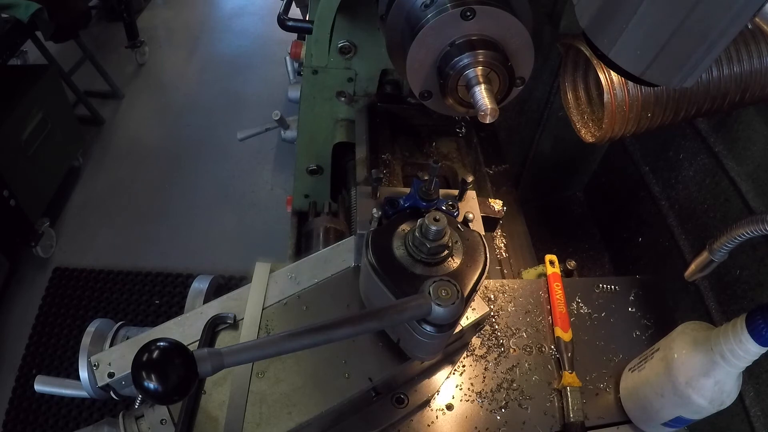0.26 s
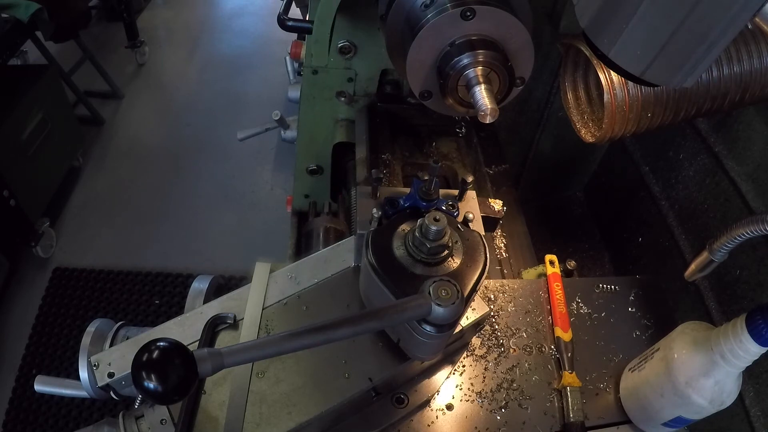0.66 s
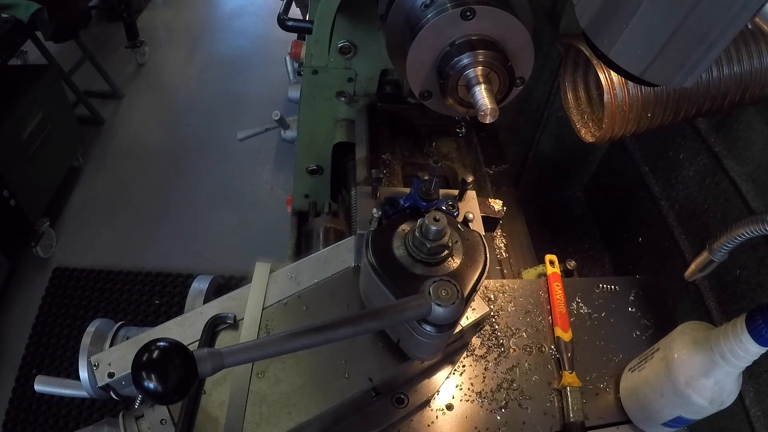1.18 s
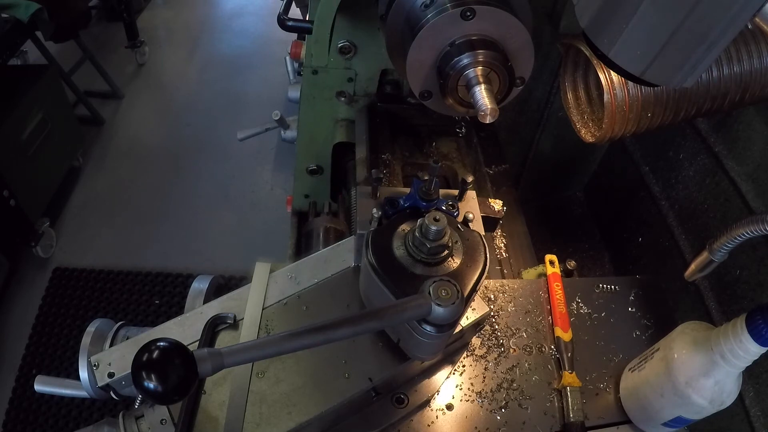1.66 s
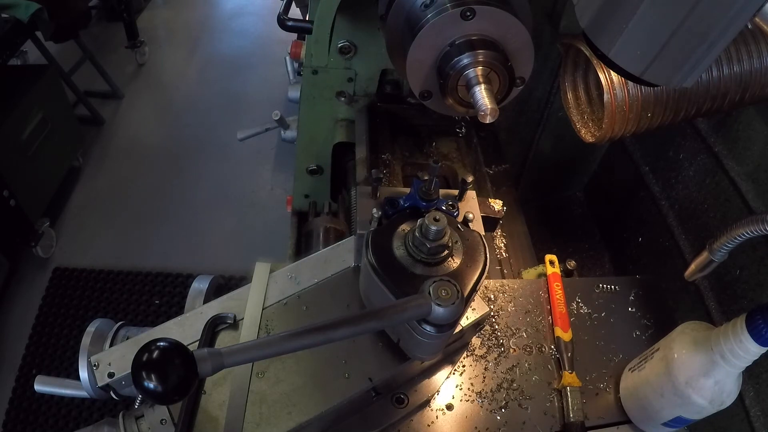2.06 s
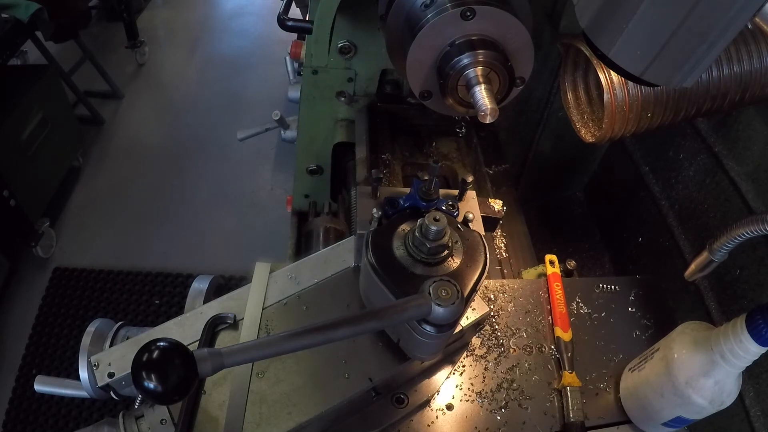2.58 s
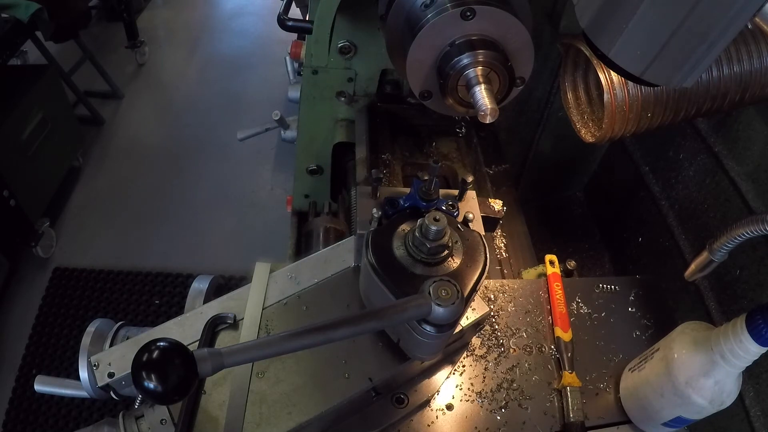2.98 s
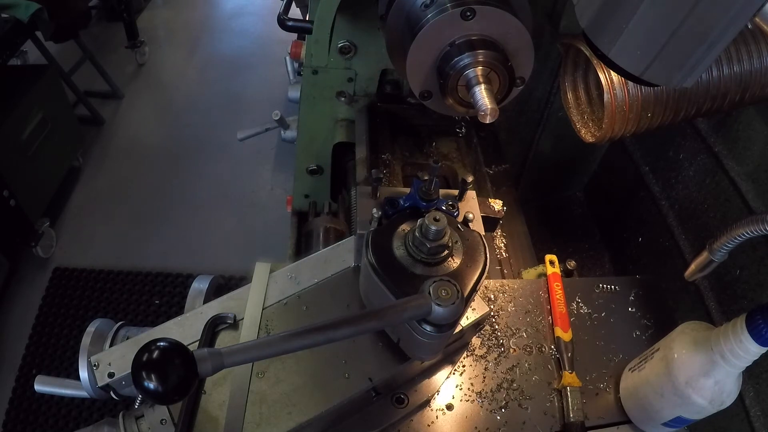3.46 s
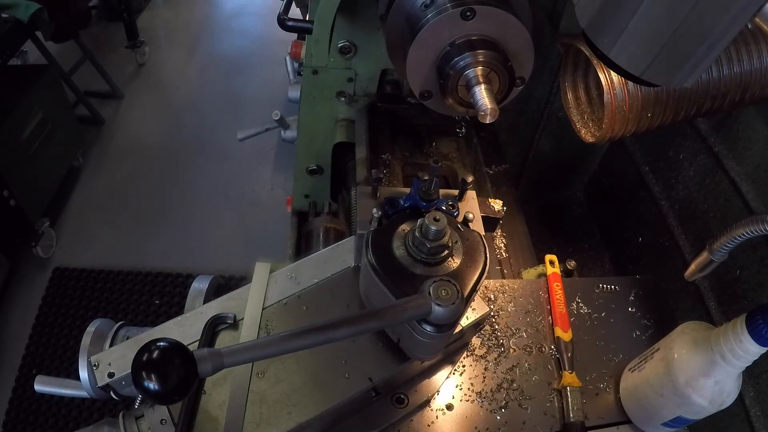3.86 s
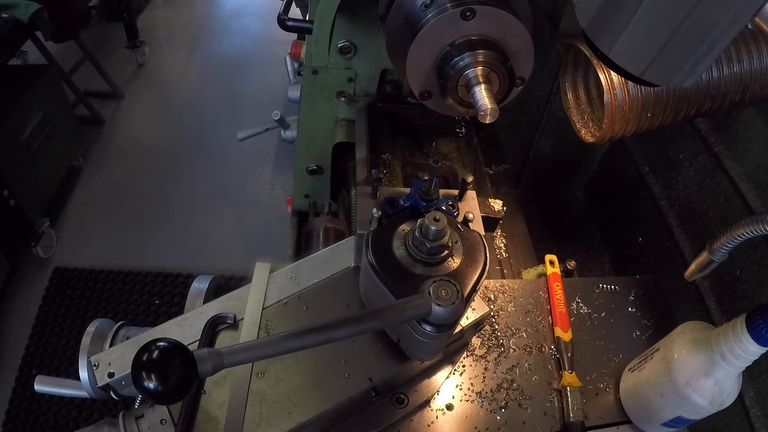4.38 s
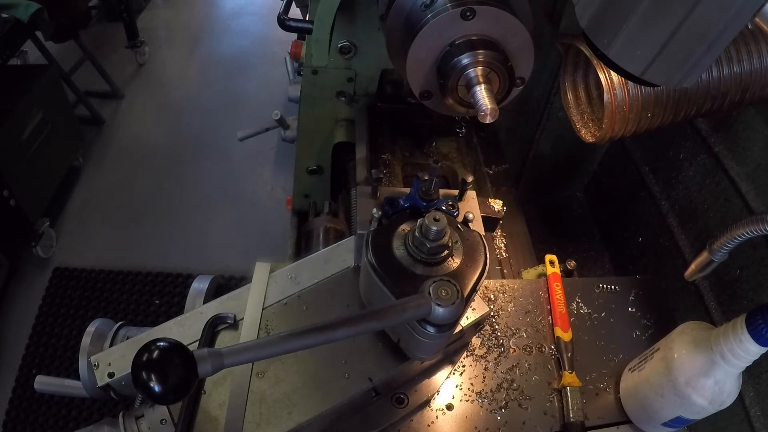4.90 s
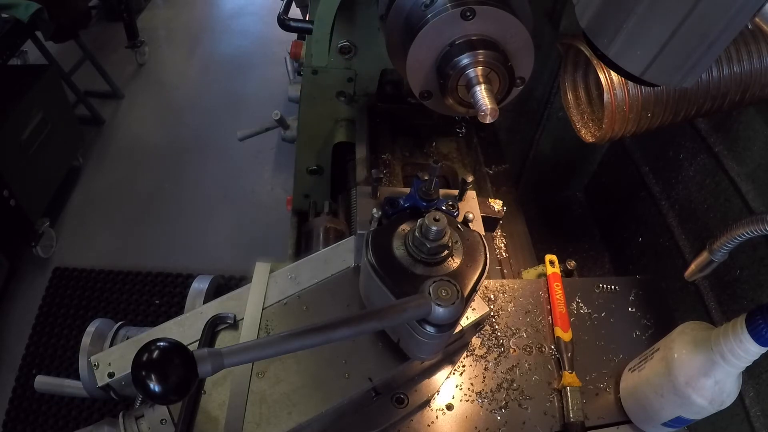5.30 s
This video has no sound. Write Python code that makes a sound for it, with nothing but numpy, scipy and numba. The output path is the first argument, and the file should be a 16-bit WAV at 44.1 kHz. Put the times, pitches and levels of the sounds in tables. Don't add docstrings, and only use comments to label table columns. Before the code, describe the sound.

Bright, fluttering air blast with breathy whistles cuts out suddenly in a workshop; a small click follows, then a hard metallic drop and ringing rattle.

```python
import sys
import numpy as np
from scipy import signal
from scipy.fft import rfft, irfft
from scipy.io import wavfile
from scipy.ndimage import uniform_filter1d
from numba import njit

SR = 44100
rng = np.random.default_rng(int(sys.argv[2]) if len(sys.argv) > 2 else 0)


def volts(x):
    e = np.asarray(x, float) / 20
    return 10 ** e


def master(y):
    cut = np.clip(np.atleast_2d(y).T, -1, 1)
    pcm = np.round(cut * 32767)
    wavfile.write(sys.argv[1], SR, pcm.astype(np.int16))


N = 243917


def rms_one(x):
    return x / np.sqrt(np.mean(x ** 2) + 1e-20)


def in_time(rows):
    s, *columns = np.transpose(rows)
    t = np.arange(N) / SR
    return [np.interp(t, s, column) for column in columns]


def at_hz(points, hz):
    points_hz, values = np.transpose(points)
    return np.interp(np.log(hz), np.log(points_hz), values)


def plateau(start, length, edge_s):
    t = np.arange(N) / SR - start
    return np.sin(np.pi / 2 * np.clip(np.minimum(t, length - t) / edge_s + .5, 0, 1)) ** 2


def burst(start, hold, level_db, attack_s, fade_db_per_s):
    t = np.arange(N) / SR - start
    return np.clip(t / attack_s, 0, 1) * volts(level_db - fade_db_per_s * np.maximum(t - hold, 0))


def coloured(spectrum):
    hz = np.maximum(np.arange(N // 2 + 1) * SR / N, 1)
    return rms_one(irfft(rfft(rng.standard_normal(N)) * volts(at_hz(spectrum, hz)), N))


def drift(rate):
    r = np.exp(-80 * np.pi * rate / SR)
    slow = signal.lfilter([1], [1, -2 * r, r * r], rng.standard_normal(N // 40 + 2002))[2000:]
    return np.interp(np.arange(N) / 40, np.arange(len(slow)), rms_one(slow))


def band_pass(x, low_hz, high_hz):
    return signal.sosfilt(signal.butter(2, [low_hz, high_hz], "band", fs=SR, output="sos"), x)


@njit
def resonate(x, angle, r):
    y = np.zeros(len(x))
    for i in range(2, len(x)):
        y[i] = x[i] - x[i - 2] + 2 * r * np.cos(angle[i]) * y[i - 1] - r * r * y[i - 2]
    return y


def blown(hz, width_hz, order=1):
    angle = 2 * np.pi * hz / SR * np.ones(N)
    air = rng.standard_normal(N)
    for _ in range(order):
        air = rms_one(resonate(air, angle, np.exp(-np.pi * width_hz / SR)))
    return air


def struck(modes, blows, spread_s):
    out = np.zeros(N)
    for hz, *levels_db, t60 in modes:
        push = np.full(N, 1e-18)
        for blow, level_db in zip(blows, levels_db):
            push[round((blow[0] + spread_s * rng.random()) * SR)] = volts(level_db)
        r = volts(-60 / (t60 * SR))
        w = 2 * np.pi * hz / SR
        ring = signal.lfilter([0, np.sin(w)], [1, -2 * r * np.cos(w), r * r], push)
        out += volts(2.5 * drift(18.7)) * ring
    return out


# f/Hz, T60/s
SHOP_T60 = [(100, 0.25), (700, 0.35), (2000, 0.39), (5000, 0.37), (13000, .3)]


def echoes():
    t = np.arange(round(.6 * SR)) / SR
    tail = np.zeros(len(t))
    for low in 60 * 2. ** np.arange(0, 8, .5):
        band = band_pass(rng.standard_normal(len(t)), low, low * 2 ** .5)
        tail += band * volts(-60 * t / at_hz(SHOP_T60, low)) * (t > .003)
    return tail / np.linalg.norm(tail)


def shop(x, wet_db):
    turn = 1.5 * drift(0.83)
    wet = signal.fftconvolve(x * np.cos(turn), echoes())
    wet += signal.fftconvolve(x * np.sin(turn), echoes())
    return x + volts(wet_db) * wet[:N]


# f/Hz, level/dB per Hz
FLOOR_NOISE = [(20, -4), (40, -2.5), (80, -13.5), (150, -10.5), (250, -17), (649, -20), (7440, -29),
               (15300, -33.5)]


def shop_floor():
    return volts(-65) * coloured(FLOOR_NOISE)


# f/Hz, level/dB per Hz
CLOTH = [(88, -31), (200, -5), (350, -2.5), (600, -3), (1310, -2.5), (2530, -10.5), (8080, -10.5),
         (15300, -26)]
# start t/s, hold t/s, level/dB, attack t/s
RUBS = [
    (3.788, 0.032, -57, .015),
    (3.848, 0.092, -72, .03),
    (4.68, .05, -65, .03),
    (4.776, .08, -61, .05),
    (4.9, .13, -67, .04),
    (5.12, .07, -64, .04),
    (5.192, 0.074, -51.5, .005),
    (5.29, 0.086, -65.5, .01),
    (5.44, .06, -63.5, .03),
]


def rustle():
    grain = volts(-1.0 + 1.6 * drift(60.)) * coloured(CLOTH)
    power = sum(burst(*rub, fade_db_per_s=300.) ** 2 for rub in RUBS)
    return grain * np.sqrt(power)


# f/Hz, level/dB, T60/s
STAND = [(20.9, -3.0, 3.8), (27.1, 1.5, 4.0)]
# t/s, signed height of the swing
SHOVES = [
    (3.847, -.0004),
    (3.889, -.0014),
    (3.931, -.002),
    (3.973, -.003),
    (4.02, -.0076),
    (4.057, -.0058),
    (4.193, .0061),
    (4.353, .0041),
    (4.53, -.0046),
]


def rocking():
    out = np.zeros(N)
    t = np.arange(N) / SR
    swing = sum(volts(db - 60 * t / t60) * np.sin(2 * np.pi * hz * t) for hz, db, t60 in STAND)
    for s, height in SHOVES:
        start = round(s * SR)
        out[start:] += height * swing[:N - start]
    return uniform_filter1d(out, size=400)


# t/s, boom level/dB, clank level/dB, crack level/dB, rattle T60/s
BLOWS = [
    (3.990, -27, -22, -31.5, 0.033),
    (4.006, -37, -28.5, -50.5, .04),
    (4.051, -24, -22, -24.5, 0.022),
    (4.144, -14.5, -18.5, -13, 0.036),
]
# f/Hz, level/dB
BLOW_SHAPE = [(70, -31), (200, -21), (600, -2.5), (1300, 0), (3900, -4), (6000, -1), (9000, -6),
              (15000, -13)]
# f/Hz, T60/s
TAIL = [(100, 1.4), (260, 1.24), (700, 0.78), (1300, 0.55), (1700, 0.41), (4850, 0.3), (12800, 0.17)]


def crash(room_db):
    out = np.zeros(N)
    t = np.arange(N) / SR
    edges = 70 * 2 ** np.arange(0, 7.9, 1 / 3)
    white = rng.standard_normal((2, N))
    for k, (low, high) in enumerate(zip(edges, edges[1:])):
        hz = np.sqrt(low * high)
        power = np.zeros(N)
        for s, boom_db, clank_db, crack_db, rattle_t60 in BLOWS:
            age = t[:N - round(s * SR)]
            level_db = at_hz([(700, boom_db), (2500, clank_db), (6000, crack_db)], hz)
            level_db += at_hz(BLOW_SHAPE, hz)
            swell = 1 - np.exp(-age / (0.00073 + 5.6 / hz))
            rattle = volts(-60 * age / rattle_t60)
            tail = volts(room_db - 60 * age / at_hz(TAIL, hz))
            power[-len(age):] += (volts(level_db) * swell) ** 2 * (rattle ** 2 + tail ** 2)
        out += np.sqrt(power) * rms_one(band_pass(white[k % 2], low, high))
    return out


# f/Hz, first-blow level/dB, last-blow level/dB, T60/s
TRAY = [(108, -40, -44.5, 0.53), (140.5, -44, -45, 0.42), (187.5, -44, -53, 1.5), (214.4, -44, -47, 1.6),
        (264, -43, -41, 1.45), (301.3, -34, -43, 0.68), (323, -39, -36, 1.91), (373, -46.5, -42.5, 1.77),
        (383, -56, -36, 1.1), (446, -58.5, -35.5, 1.15), (485.4, -38, -24, 0.57), (608, -37, -37, 1.3),
        (640, -43, -22.5, 0.41), (662, -53, -44.5, 1.29),
        (722, -28, -25, 0.47), (762, -38, -24.5, 0.3), (805, -17.5, -25, 0.06), (842, -38, -21.5, 0.23),
       (886, -38, -29, 0.71), (951, -45.5, -27.5, 0.7), (1047, -33, -26, 0.23), (1160, -37, -31, 0.65),
       (1210, -54.5, -30, 0.26), (1306, -43, -28.5, 0.38), (1316, -35, -29.5, 0.52)]


def tray():
    return struck(TRAY, (BLOWS[0], BLOWS[3]), spread_s=0.011)


# f/Hz, bounce level/dB, last-blow level/dB, T60/s
GUN = [(1930, -36, -35.5, 0.2), (2200, -43, -32.5, 0.4), (2420, -33.5, -37, 0.28), (2870, -40, -49, 0.25),
       (3150, -38, -36.5, 0.35), (3520, -43, -49, .12), (4250, -37, -30, 0.1), (4820, -52, -40, .08),
       (5420, -48, -22, .04), (5750, -31.5, -23.5, 0.15), (5890, -38, -34.5, 0.037),
       (6900, -43.5, -18, .045), (7350, -31, -42, .06), (7800, -32, -20.5, .04)]


def gun_body():
    return struck(GUN, BLOWS[2:], spread_s=.003)


# t/s, peak level/dB, ring f/Hz
TICKS = [
    (3.7133, -19.5, 6200),
    (3.732, -35, 6100),
    (3.7892, -47, 6220),
]


def trigger():
    out = np.zeros(N)
    t = np.arange(round(.15 * SR)) / SR
    for s, peak_db, hz in TICKS:
        fizz = band_pass(rng.standard_normal(len(t)), 3200., 11000.)
        thud = band_pass(rng.standard_normal(len(t)), 600., 2600.)
        tick = (0.81 * np.sin(2 * np.pi * hz * t) + 0.48 * fizz) * np.exp(-t / 0.0018)
        rattle = volts(-23.0) * fizz * np.exp(-t / 0.036)
        knock = volts(-17.5) * thud * np.exp(-t / 0.039) * (1 - np.exp(-t / 0.0031))
        out[round(s * SR):][:len(t)] += volts(peak_db - 3.0) * (tick + rattle + knock)
    return out


# f/Hz, level/dB per Hz
THUMP = [(18, 8), (40, -6), (150, -4), (500, 0), (1500, -34), (4000, -62)]
# f/Hz, level/dB per Hz
PUFF = [(300, -22), (1000, -7), (2500, -5.5), (6000, 3.5), (10000, 3), (15000, -10.5)]


def valve():
    thump = burst(3.175, 0.045, -40.5, attack_s=0.09, fade_db_per_s=193) * coloured(THUMP)
    puff = plateau(3.238, 0.033, edge_s=0.0089) * volts(-21.5) * coloured(PUFF)
    return thump + puff


# t/s, hiss level/dB, first-mode drive level/dB, third-mode drive level/dB,
# fifth-mode level over the hiss/dB, fifth-mode f/Hz
HAND = [(0.0, -20, -27, -21, -2.5, 7450), (0.11, -22, -29.5, -29, -4.5, 7050),
        (0.24, -21, -32, -28.5, -6.5, 7330), (0.6, -21, -28, -26, -3, 7360),
        (0.9, -21.5, -30, -25, -4, 7350), (1.1, -23, -32, -27.5, -4, 7100),
        (1.3, -23.5, -34.5, -32.5, -2.5, 7220), (1.56, -23.5, -30.5, -28, -3, 7200),
        (1.75, -20, -31, -26, -4, 7200), (2.0, -19, -26.5, -22, -2.5, 6860),
        (2.2, -22, -32, -23.5, 1, 7650), (2.33, -23.5, -36, -27.5, -3.5, 7650),
        (2.63, -24, -36, -34, -1, 7740), (2.81, -22, -38, -33.5, -1.5, 7800),
        (3.0, -23, -35.5, -30, -0.5, 7800), (3.2, -25.5, -35.5, -32, -2.5, 7800)]
# start t/s, length t/s, hiss rise/dB, first-mode rise/dB, third-mode rise/dB
STROKES = [(0.116, .036, 10, -14.5, -7), (0.809, 0.039, 5.5, -19, -14), (0.93, .12, 5.5, 0, 6.5),
           (1.201, 0.074, 8.5, 5, 10.5), (1.352, 0.1, 5, -1, 2), (2.097, 0.14, 3, -4.5, 2),
           (2.377, 0.18, 6.5, 3.5, 8), (2.654, .13, 4.5, 2.5, 8.5), (2.821, .13, 4, 7.5, 7.5),
           (3.015, .155, 6.5, 4, 3.5), (3.237, 0.022, 6.5, -25, 6)]
# start t/s, length t/s, first-mode rise/dB, third-mode rise/dB
CROSSINGS = [(0.284, 0.096, 6, 1), (0.511, 0.04, 7, 2), (0.6, 0.12, 1, -2), (0.938, 0.091, 5.5, -3.5),
             (1.154, 0.063, 10.5, 4), (1.812, 0.066, 4.5, 1), (2.173, 0.048, 11.5, 5.5),
             (2.422, 0.057, 11, 1.5), (2.512, .055, 10, 1), (2.69, 0.092, 12, 5.5), (2.878, 0.047, 7, 3),
             (3.067, 0.076, 7.5, 7)]


def aim():
    hiss_db, first_db, third_db, over_db, fifth_hz = in_time(HAND)
    hiss_up, first_up, third_up = sum(np.outer(up, plateau(s, length, edge_s=0.014))
                                      for s, length, *up in STROKES)
    first_in, third_in = sum(np.outer(up, plateau(s, length, edge_s=.025))
                             for s, length, *up in CROSSINGS)
    hiss_db = hiss_db + hiss_up
    third_db = third_db + third_up + third_in
    return hiss_db, first_db + first_up, first_in, third_db, hiss_db + over_db, fifth_hz


# f/Hz, level/dB per Hz
NOZZLE = [(1500, -35.5), (2300, -21), (3200, -9), (6000, -10.5), (9000, -3.5), (12000, 0), (14000, -2.5),
          (15500, -3.5)]
# f/Hz, width f/Hz, level/dB
WHISTLES = [(8870, 180, -15), (10100, 400, -13), (11850, 350, -11), (13100, 400, -14)]
# start t/s, length t/s, f/Hz, level over the hiss/dB
SQUEALS = [(0.19, 0.1, 7650, -3), (0.328, 0.074, 11400, -10.5), (0.357, 0.13, 7700, -14),
           (0.42, 0.42, 8860, -11), (0.971, 0.089, 8040, -5.5), (1.176, 0.047, 10020, -1.5),
           (1.226, 0.069, 12800, -11), (1.363, 0.11, 11800, -6), (1.368, .1, 4300, -13),
           (1.58, 0.14, 4330, -5.5), (1.768, 0.23, 4310, -7.5), (2.05, 0.31, 11760, -5.5),
           (2.058, 0.16, 7230, -5.5), (2.125, 0.16, 10460, -5.5), (2.094, .33, 13270, -8.5),
           (3.022, .06, 9700, -5)]


def nozzle_hiss(hiss_db):
    air = coloured(NOZZLE)
    for hz, width_hz, db in WHISTLES:
        air += volts(db + 1.5 * drift(6.1)) * blown(hz * (1 + 0.011 * drift(4.1)), width_hz, order=2)
    for s, length, hz, db in SQUEALS:
        air += volts(db) * plateau(s, length, edge_s=.03) * blown(hz, 0.078 * hz, order=2)
    return volts(hiss_db - 2.5 + 1.3 * drift(40.)) * air


def rim_hiss(first_db):
    return volts(first_db - 16.5) * blown(2760, 1200, order=2)


def hole_mode(hz, core_hz, skirt_hz, core_db):
    core = volts(core_db + 1.3 * drift(7.5)) * blown(hz, core_hz)
    skirt = blown(hz, skirt_hz, order=2)
    return (core + skirt) / np.sqrt(1 + volts(core_db) ** 2)


# f/Hz, level/dB per Hz
SPILL = [(30, -77.5), (150, -42.5), (350, -26), (1000, -15), (1400, -8.5), (1810, -9.5), (2150, -22.5),
         (3000, -37)]


def first_mode(first_db, first_in):
    pure_db = 4.5 + 1.34 * first_in + 1.3 * drift(2.3)
    note = hole_mode(1436 * (1 + 0.005 * drift(5.1)), core_hz=55, skirt_hz=300, core_db=pure_db)
    spill = volts(-0.5 - 0.47 * pure_db) * coloured(SPILL)
    return volts(first_db + first_in - 3.0) * (note + spill)


def third_mode(third_db):
    hz = 4380 * (1 + 0.014 * drift(5.5))
    pure_db = -7.5 + 4.1 * drift(2.2)
    return volts(third_db - 5.0) * hole_mode(hz, core_hz=199.7, skirt_hz=2112, core_db=pure_db)


def fifth_mode(fifth_db, fifth_hz):
    hz = fifth_hz * (1 + 0.025 * drift(8.0))
    pure_db = -8 + 1.5 * drift(3.8)
    return volts(fifth_db - 3.5) * hole_mode(hz, core_hz=215.6, skirt_hz=1960, core_db=pure_db)


def jet():
    hiss_db, first_db, first_in, third_db, fifth_db, fifth_hz = aim()
    air = nozzle_hiss(hiss_db) + rim_hiss(first_db)
    hole = first_mode(first_db, first_in) + third_mode(third_db) + fifth_mode(fifth_db, fifth_hz)
    valve_open = burst(-1, 1 + 3.268, 0, attack_s=1, fade_db_per_s=3004)
    return valve_open * (air + hole)


def scene():
    background = shop_floor() + rustle() + rocking()
    drop = volts(-8.5) * crash(room_db=-3.5) + tray()
    clank = shop(gun_body(), wet_db=-17.0)
    air = shop(jet() + valve(), wet_db=-5.0)
    return (background + drop + clank + trigger() + air)[None, :]


def roll_off(x):
    return signal.sosfilt(signal.butter(12, 15870, fs=SR, output="sos"), x)


def record(dry):
    rumble = band_pass(dry ** 2, 12, 400.)
    rounded = 0.89 * np.tanh(dry / 0.86) + volts(-18.0) * rumble
    top_cut = signal.ellip(12, .5, 45, 15330, fs=SR, output="sos")
    mix = signal.sosfilt(top_cut, rounded)
    return roll_off(mix)


dry = scene()
out = record(dry)
master(out)
```